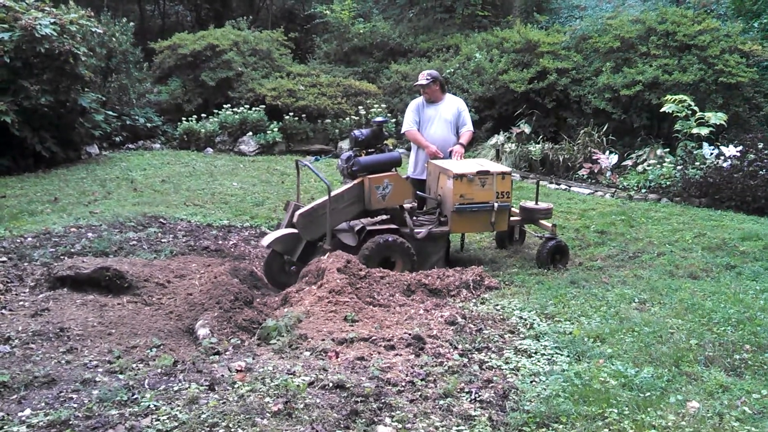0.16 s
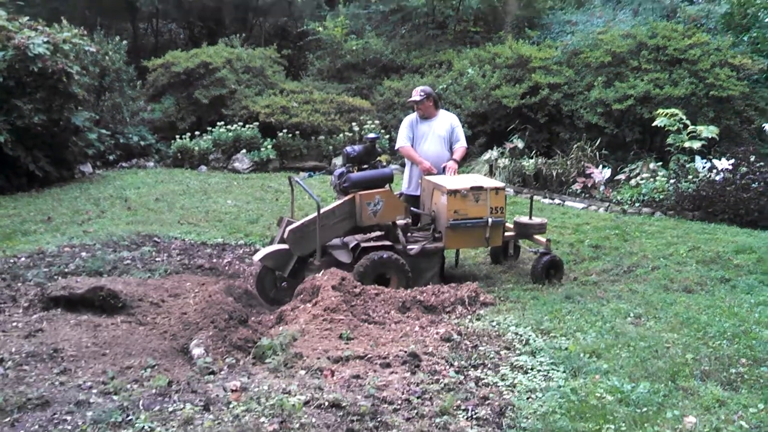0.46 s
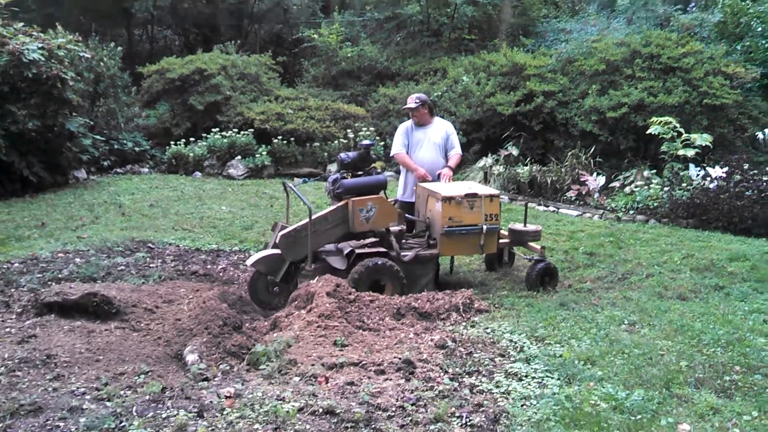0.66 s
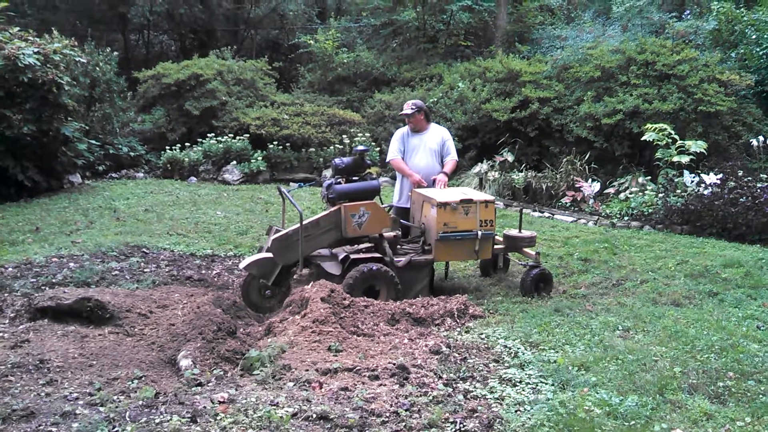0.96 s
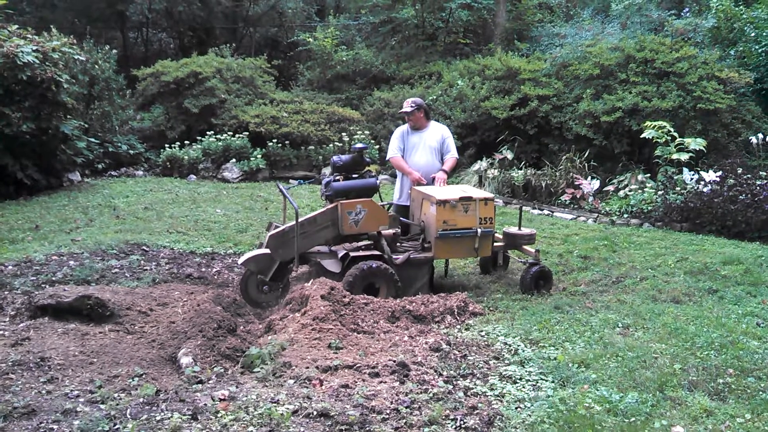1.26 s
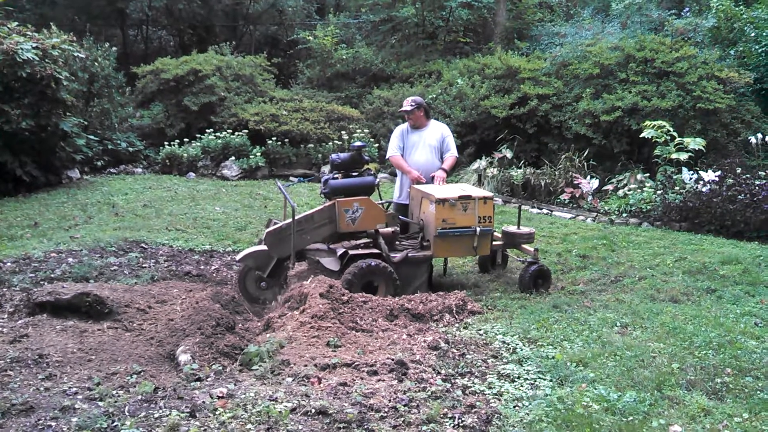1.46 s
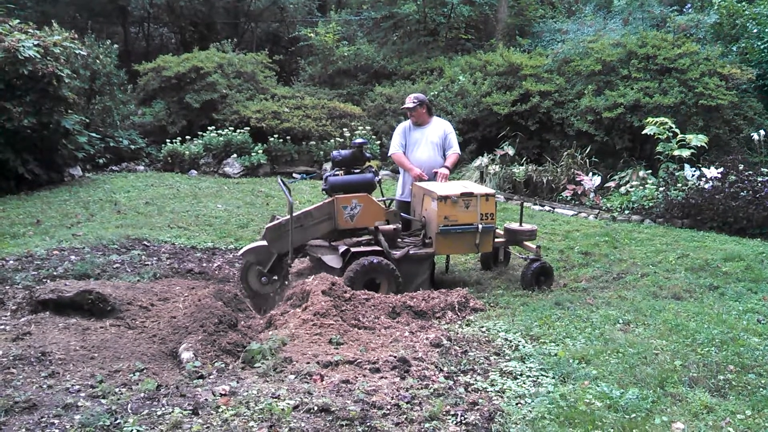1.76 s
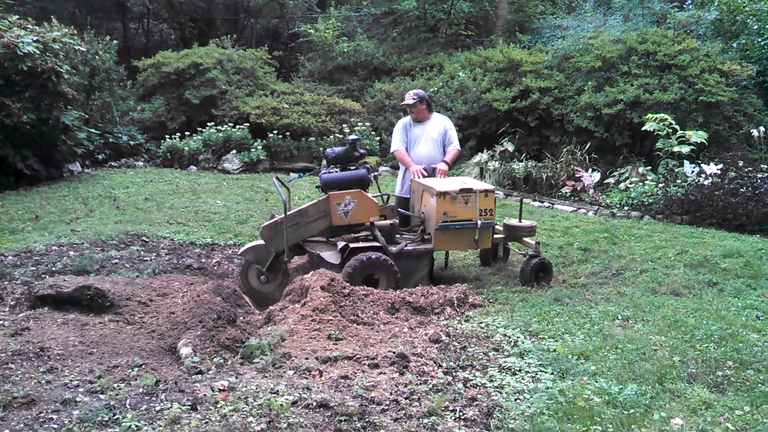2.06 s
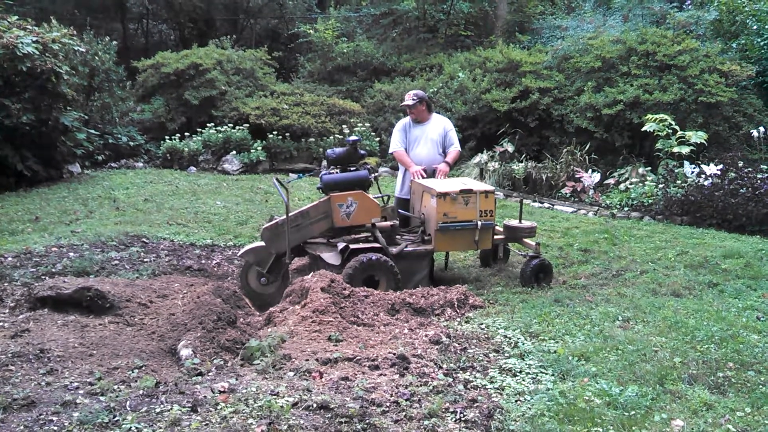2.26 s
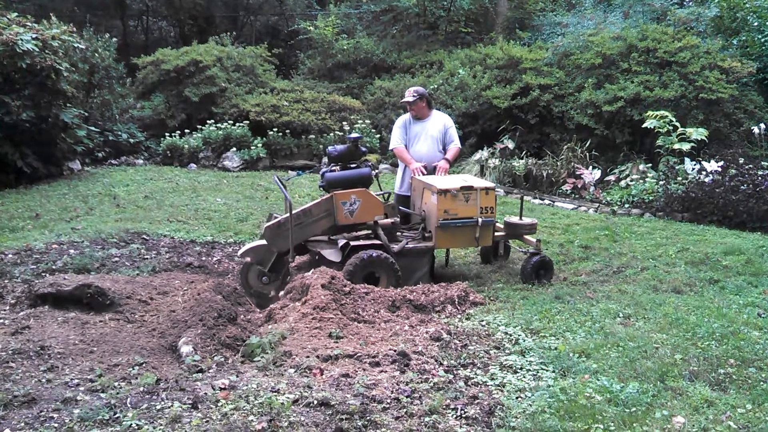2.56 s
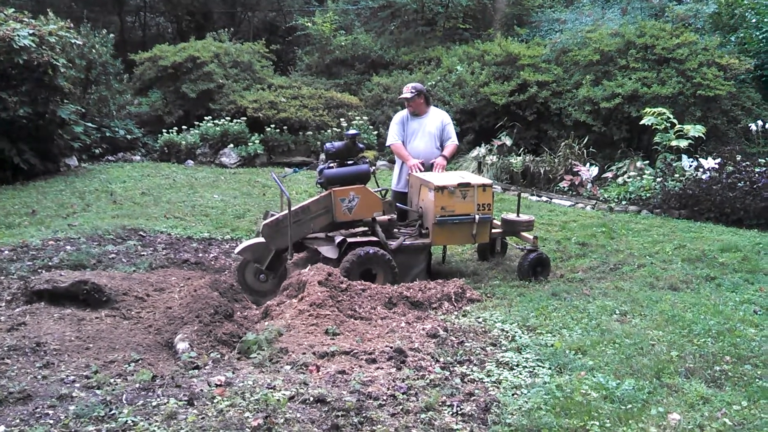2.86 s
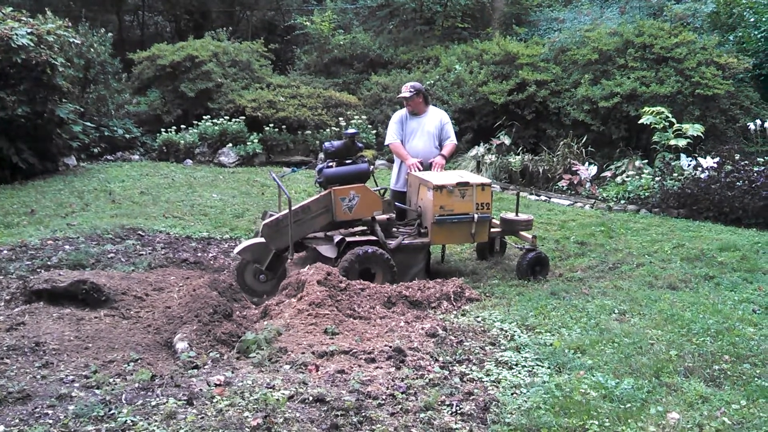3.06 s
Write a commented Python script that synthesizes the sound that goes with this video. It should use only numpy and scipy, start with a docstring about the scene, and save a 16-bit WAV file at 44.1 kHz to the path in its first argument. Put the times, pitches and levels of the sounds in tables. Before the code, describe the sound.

Continuous harsh grinding from a petrol stump grinder, with fluttering bites and spraying splinters. The engine pitch climbs, a sharp metallic clack sounds, the noise thins briefly, then the wheel digs in again; open-air, dry, wide stereo pickup.

```python
"""The toothed wheel of a stump grinder tears through wood and soil in a garden, driven by a petrol engine.
Noise in tiny impacts, pulsed by the bites, rings guard, panel and wheel and sprays crackling chips.
The twin-cylinder exhaust is a stack of sine orders of the engine speed. As the wheel comes free the engine
speeds up, a tooth clacks on something hard and the sound dips; then the wheel bites again and pulls it down."""
import sys
import numpy as np
from scipy.fft import rfft, irfft, next_fast_len
from scipy.io import wavfile
from scipy.ndimage import map_coordinates

SR = 44100
rng = np.random.default_rng(int(sys.argv[2]) if len(sys.argv) > 2 else 0)


def pcm_store(signal):
    """Save signal as 16-bit PCM."""
    levels = np.round(np.clip(np.atleast_2d(signal), -1, 1) * 32767)
    wavfile.write(sys.argv[1], SR, levels.astype(np.int16).T)


N = 141120

# Engine speed. Each row: time in seconds, four-stroke cycles per second.
ENGINE_SPEED = [(0, 26.6), (.15, 26.6), (.33, 27.1), (.51, 27.3), (.69, 26.8), (.87, 26.6), (1.05, 26.9),
                (1.23, 27.8), (1.59, 30.1), (1.85, 32), (2.13, 31.1), (2.49, 28.7), (2.67, 27.7),
                (3.03, 28), (3.2, 27.6)]
WHEEL_TURNS_PER_CYCLE = .69

# Strength of each group of teeth around the wheel, in dB.
TEETH_DB = [2, -2, -1]
BITE_DECAY_TURNS, BITE_SCATTER_DB = .04, 3
BITE_DEPTH = 1.3  # peak of a 0 dB bite, on top of a steady 2

# Loudness of the cut before trims. Each row: time in seconds, guard roar in dB, rasp (and rumble) in dB.
CUT_LEVELS = [(0, -30, -30), (.1, -27.5, -27.5), (.16, -33, -30.5), (.38, -29, -28.5), (.62, -27.5, -29.5),
              (.8, -31, -32), (1.15, -31.5, -31.5), (1.28, -28.5, -30.5), (1.55, -29.5, -32),
              (1.62, -32.5, -33), (1.85, -31.5, -31.5), (1.905, -31, -33), (1.92, -35.5, -37.5),
              (2.14, -37, -39), (2.24, -32, -32.5), (2.47, -33, -32.5), (2.55, -29, -30.5),
              (2.65, -32, -33), (2.73, -30.5, -30.5), (3.13, -31, -32), (3.19, -26, -29.5)]
ROAR_TRIM_DB, RASP_TRIM_DB, RUMBLE_TRIM_DB = -1, 1.5, -1
ROAR_BITE_POWER, RASP_BITE_POWER = .5, .8  # how strongly each follows the bites
# Ringing of the guard and frame. Each row: pitch in Hz, width in Hz, level in dB.
GUARD_MODES = [(274.7, 22.5, -4.5), (315, 20, -3.5), (378, 113, -9.5), (458, 51, -5.5), (504.4, 25, -7),
               (565, 26.4, -4.5), (664, 43, -7.5)]
GUARD_LOW_HZ = 170  # the roar thins out below this
# Ringing of a side panel. Each row: pitch in Hz, width in Hz, level in dB.
PANEL_MODES = [(318, 22, 0), (356, 36, -3)]
# The panel's drone, swelling from when the wheel comes free and on through the next bite.
# Each row: time in seconds, dB against the guard.
PANEL_LEVEL = [(0, -10), (1.7, -10), (2, -6.5), (2.6, -4.5), (3.2, -3)]
# Ringing of the wheel and teeth. Each row: pitch in Hz, width in Hz, level in dB.
WHEEL_MODES = [(875, 56, -3.5), (978.5, 76, -2), (1229, 30, -7), (1372, 38, -1), (1473, 345, -11),
               (1940, 225, -7), (2388, 126, 0)]
# Tone of the machine's rumble. Each row: frequency in Hz, relative level in dB.
RUMBLE_TONE = [(25, -48), (45, -36), (90, -12), (170, -4), (235, -6.5), (300, -8), (700, -5), (1500, -4),
               (3000, -15.5), (6000, -19)]

# Chip spray before its trim. Each row: time in seconds, level in dB.
SPRAY_LEVEL = [(0, -28), (.22, -28.2), (.42, -24.8), (.6, -25), (.8, -27.8), (1.05, -29), (1.28, -28.6),
               (1.5, -30.3), (1.68, -33.5), (1.82, -33.5), (1.9, -32.5), (1.92, -36.5), (2.02, -35),
               (2.13, -39), (2.23, -30.5), (2.47, -30.3), (2.85, -27.7), (3.2, -27)]
SPRAY_TRIM_DB = 2
# Tone of chips and cracks. Each row: frequency in Hz, relative level in dB.
CHIP_TONE = [(900, -1.5), (2000, -33), (2900, 3), (3600, 4), (4300, -0.5), (6500, 0), (8800, 6),
             (10600, -5.5), (12200, -6), (13500, 1.5), (15000, 5)]
SPLINTERS_PER_S, SPLINTER_HZ, SPLINTER_OCTAVES = 830, 5000, .72  # rate, middle pitch, spread of pitch
SPLINTER_DECAY_CYCLES = 29
SPLINTER_SPREAD_DB, SPLINTER_DB = 1, -5  # spread of size, level against the fine spray

# Teeth hitting something hard.
# Each row: start in seconds, level before tone and trims in dB, share of steel ring 0-1.
STRIKES = [(.368, -19, .1), (.579, -19, .1), (1.42, -23, .1), (1.4691, -21, .1), (1.5184, -19.5, .1),
           (1.567, -21, .1), (1.8604, -22, .2), (1.9043, -13, 1), (1.9075, -22, 1), (1.9345, -24, .2),
           (1.9487, -18.5, .8), (2.0254, -27, .2), (2.2064, -22, .1), (2.4134, -19, .1), (2.599, -20, .1),
           (3.0894, -16.5, .2)]
CRACK_TRIM_DB, STRIKE_RISE_S, CRACK_T60_S = 3, .0003, .016
# Ringing of a steel tooth. Each row: pitch in Hz, relative level in dB.
STEEL_MODES = [(6600, -12), (9200, -6), (12600, -9), (15100, -3)]
STEEL_TRIM_DB, STEEL_T60_S = -9, .018

# Exhaust before trims; overtones fall away as the throttle closes.
# Each row: time in seconds, firing note in dB, overtones in dB.
EXHAUST_LEVELS = [(0, -45.5, -45.5), (.5, -44, -44), (.9, -45, -44.5), (1.3, -41, -41.5), (1.6, -40.5, -43),
                  (1.8, -43, -48), (1.9, -44, -48), (1.95, -49, -54), (2.13, -49, -56), (2.31, -49, -53),
                  (2.5, -46, -48.5), (2.67, -47.5, -47.5), (2.85, -45, -45.5), (3.2, -45, -46)]
FIRING_TRIM_DB, OVERTONE_TRIM_DB = 2, 1.5
# Exhaust overtones. Each row: multiple of the cycle rate, relative level in dB.
OVERTONES = [(3, 1), (4, -6), (5, 1.5), (6, .5), (7, -7), (8, -7), (12, -5), (13, -5), (14, -7), (15, -7),
             (19, -7), (20, -5), (21, -3)]
UNSTEADY_DB, UNSTEADY_RAD = .2, .02  # per multiple of the cycle rate
PIPE_HZ, PIPE_WIDTH_HZ, PIPE_DB = 183, 10, 4  # peak
HOLLOW_HZ, HOLLOW_WIDTH_HZ, HOLLOW_DB = 151, 4, -14  # dip
# Muffler growl before throttle and trim. Each row: time in seconds, level in dB.
GROWL_LEVEL = [(0.0, -45), (0.11, -30), (0.13, -39), (0.47, -31), (0.59, -37), (0.61, -27), (0.76, -38),
               (1.18, -35), (1.21, -30), (1.8, -40), (1.82, -34), (2.07, -42), (2.64, -40), (2.85, -36),
               (3.2, -38)]
# Orders that the muffler brings out. Each row: multiple of the cycle rate, relative level in dB.
GROWL_ORDERS = [(9, -4), (10, 1), (11, -6)]
GROWL_TRIM_DB, GROWL_THROTTLE_SHARE = -3, .4
MUFFLER_HZ, MUFFLER_WIDTH_HZ = 285, 70

# Stereo balance. Each row: frequency in Hz, left over right in dB.
BALANCE = [(60, 8), (120, 8), (170, 4), (235, 9), (275, 5), (320, 10), (410, 11), (465, -3), (560, 3),
           (780, 8.5), (900, 0), (1350, 0), (1700, -8), (2200, -1.5), (2600, 0)]
EVEN_ABOVE_HZ = 2600  # no balance tilt from here up
# Left-right likeness of the noise. Each row: frequency in Hz, likeness 0-1.
LIKENESS = [(100, 0.88), (400, 0.85), (1000, 0.57), (1800, 0.91), (3500, 0.9), (8500, 0.53), (11500, .45),
            (14500, .4)]
# Phase between the microphones. Each row: frequency in Hz, lead of the left channel in radians.
LEFT_LEAD = [(55, -2.7), (130, -1.3), (215, .1), (255, -1.1), (295, -.5), (390, -.8), (430, -1.7), (510, 0),
             (740, .2), (830, -1), (1000, 0), (1550, 0), (1850, 1.8), (2750, 3.1)]
RIGHT_LAG_S = .000363
TOP_HZ = 15500


def bites(speed):
    """Each group of teeth digs in once a turn: a pulse whose strength differs from bite to bite."""
    turns = np.cumsum(speed) * WHEEL_TURNS_PER_CYCLE / SR
    passes = turns * len(TEETH_DB)
    bite_db = np.resize(TEETH_DB, 400) + BITE_SCATTER_DB * rng.standard_normal(size=400)
    size = amp(bite_db)[passes.astype(int)]
    turns_off_peak = np.abs(passes % 1 - .5) / len(TEETH_DB)
    return 2 + BITE_DEPTH * size * np.exp(-turns_off_peak / BITE_DECAY_TURNS)


def cutting(bite):
    """Teeth tear the wood: the guard roars, a panel drones, the wheel rasps and the machine rumbles."""
    roar_db, rasp_db = curves(CUT_LEVELS)
    panel_db, = curves(PANEL_LEVEL)

    def blows():
        """Impact noise that swells with the bites."""
        return grit(300, spread_db=1) * bite ** ROAR_BITE_POWER

    body = ringing(blows(), GUARD_MODES) + amp(panel_db) * ringing(blows(), PANEL_MODES)
    body = filtered(body, lambda hz: 1 - 1 / (1 + (hz / GUARD_LOW_HZ) ** 6))
    roar = amp(roar_db + ROAR_TRIM_DB + .15 * wobble(15)) * body
    scrape = grit(600, spread_db=2) * bite ** RASP_BITE_POWER
    rasp = amp(rasp_db + RASP_TRIM_DB) * ringing(scrape, WHEEL_MODES)
    rumble = amp(rasp_db + RUMBLE_TRIM_DB) * coloured(grit(200, spread_db=1), RUMBLE_TONE)
    return roar + rasp + rumble


def chips(bite):
    """Splinters and grit crackle off the wheel, swelling with each bite."""
    spray_db, = curves(SPRAY_LEVEL)
    crackle = unit(grit(1800, spread_db=2) + amp(SPLINTER_DB) * splinters())
    spray = amp(spray_db + SPRAY_TRIM_DB + .36 * wobble(45)) * unit(bite) * crackle
    return spray.std() * coloured(spray, CHIP_TONE)


def splinters(size=640):
    """Each flying splinter is a brief ring at its own pitch (direct, scattered)."""
    count = int(SPLINTERS_PER_S * N / SR)
    when, pitch, weight, *phases = rng.random((count, 5)).T[..., None]
    octaves = SPLINTER_OCTAVES * np.log(pitch / (1 - pitch)) / 2
    hz = SPLINTER_HZ * 2 ** octaves
    cycles = np.minimum(hz, TOP_HZ) * np.arange(size) / SR
    strength = amp(-SPLINTER_SPREAD_DB * np.log(np.maximum(weight, .01)))
    life = strength * np.exp(-cycles / SPLINTER_DECAY_CYCLES)
    at = ((when * N).astype(int) + np.arange(size)).ravel()

    def scatter(phase):
        """Lay all the rings into one channel."""
        rings = life * np.sin(2 * np.pi * (cycles + phase))
        return np.bincount(at, rings.ravel(), N)[:N]

    return unit(np.array([scatter(phase) for phase in phases]))


def strikes():
    """A tooth hits something hard: a noise crack, with a set share of bright steel ring."""
    cracks, rings = np.zeros(N), np.zeros((2, N))
    for start, db, ring_share in STRIKES:
        age = np.maximum(np.arange(N) / SR - start, 0)
        blow = amp(db) * np.minimum(age / STRIKE_RISE_S, 1)
        cracks += blow * amp(CRACK_TRIM_DB - 60 * age / CRACK_T60_S)
        # each blow detunes the modes slightly
        steel = sum(amp(level) * np.sin(2 * np.pi * hz * rng.normal(1, .01) * age)
                    for hz, level in STEEL_MODES)
        rings += ring_share * blow * amp(STEEL_TRIM_DB - 60 * age / STEEL_T60_S) * steel
    cracks = cracks * rng.standard_normal((2, N))
    return cracks.std() * coloured(cracks, CHIP_TONE) + rings


def exhaust_note(speed):
    """Firing orders, less steady the higher they are, glide through the resonances of pipe and muffler."""
    firing_db, overtone_db = curves(EXHAUST_LEVELS)
    growl_db, = curves(GROWL_LEVEL)
    cycle = np.cumsum(speed) / SR

    def partial(k):
        """One multiple of the cycle rate, at about rms 1."""
        phase = 2 * np.pi * (k * cycle + rng.random()) + UNSTEADY_RAD * k * wobble(22)
        return np.sqrt(2) * amp(UNSTEADY_DB * min(k, 10) * wobble(14)) * np.sin(phase)

    def bell(offset):
        """Resonance shape, 1 at the centre."""
        return 1 / (1 + offset ** 2)

    def pipe_db(hz):
        """The pipe's peak and the hollow below it."""
        peak = PIPE_DB * bell((hz - PIPE_HZ) / PIPE_WIDTH_HZ)
        return peak + HOLLOW_DB * bell((hz - HOLLOW_HZ) / HOLLOW_WIDTH_HZ)

    def muffler(hz):
        """Gain of the muffler's resonance."""
        return 1 / np.hypot(1, 2 * (hz - MUFFLER_HZ) / MUFFLER_WIDTH_HZ)

    overtones = sum(amp(db + pipe_db(k * speed)) * partial(k) for k, db in OVERTONES)
    throttle = amp(GROWL_THROTTLE_SHARE * (overtone_db - overtone_db.max()))
    growl = throttle * sum(amp(db) * partial(k) * muffler(k * speed) for k, db in GROWL_ORDERS)
    firing = amp(firing_db + FIRING_TRIM_DB) * partial(2)  # two cylinders fire in each cycle
    return firing + amp(overtone_db + OVERTONE_TRIM_DB) * overtones + amp(growl_db + GROWL_TRIM_DB) * growl


def microphones(note, noise):
    """A wide stereo pair: phase differs by pitch, the right lags inverted up high, scatter blurs the image."""
    def blur(hz):
        """Shares of direct and scattered noise."""
        alike = np.clip(along(LIKENESS, hz), 0, 1)
        return np.array([alike, np.sqrt(1 - alike ** 2)])

    def lead(hz):
        """Lead of the left channel in radians: the table down low, lag and inversion above."""
        lagged = 2 * np.pi * hz * RIGHT_LAG_S - np.pi
        return np.where(hz * RIGHT_LAG_S < 1, along(LEFT_LEAD, hz), lagged)

    def balance(hz):
        """Half the tilt to each side."""
        return amp(np.outer([.5, -.5], along(BALANCE, hz) * (hz < EVEN_ABOVE_HZ)))

    blurred = filtered(noise, blur).sum(axis=0)
    mid = filtered(note + noise[0], lambda hz: np.cos(lead(hz) / 2))
    side = filtered(note + blurred, lambda hz: 1j * np.sin(lead(hz) / 2))
    return filtered(np.array([mid + side, mid - side]), balance)


def amp(db):
    """Decibels to gain."""
    return 10 ** (np.asarray(db) / 20)


def unit(x):
    """Scale to rms 1."""
    return x / np.sqrt(np.mean(x ** 2) + 1e-20)


def along(points, hz):
    """Read (Hz, value) points on a log axis."""
    f, v = np.transpose(points)
    return np.interp(np.log(hz + 1), np.log(f + 1), v)


def curves(rows):
    """One value per sample for each column after the time."""
    s, *cols = np.transpose(rows)
    return [np.interp(np.arange(N) / SR, s, c) for c in cols]


def wobble(rate):
    """A smooth random curve, rate knots a second."""
    knots = rng.standard_normal(int(N * rate / SR) + 4)
    return map_coordinates(knots, [np.arange(N) * rate / SR])


def filtered(x, response):
    """Multiply the spectrum of x by a complex response of frequency."""
    m = next_fast_len(N + SR // 2)
    return irfft(rfft(x, m) * response(np.fft.rfftfreq(m, 1 / SR)), m)[..., :N]


def ringing(x, modes):
    """Sound x through the resonances of a body, at rms 1."""
    def body(f):
        """Sum of band-pass resonances, alternating in sign."""
        return sum((-1) ** k * amp(db) * 1j * f * w / (c * c - f * f + 1j * f * w)
                   for k, (c, w, db) in enumerate(modes))

    return unit(filtered(x, body))


def coloured(x, spectrum):
    """Give x a tone, at rms 1."""
    return unit(filtered(x, lambda hz: amp(along(spectrum, hz))))


def grit(rate, spread_db):
    """Two noises (direct, scattered) broken into the same tiny impacts of random size."""
    return unit(rng.standard_normal((2, N)) * amp(spread_db * wobble(rate)))


def scene():
    """One speed drives both the wheel and the exhaust."""
    speed, = curves(ENGINE_SPEED)
    bite = bites(speed)
    noise = cutting(bite) + chips(bite) + strikes()
    return microphones(exhaust_note(speed), noise)


def record(dry):
    """Cut everything from the band limit up."""
    return filtered(dry, lambda hz: hz < TOP_HZ)


dry = scene()
out = record(dry)
pcm_store(out)
```